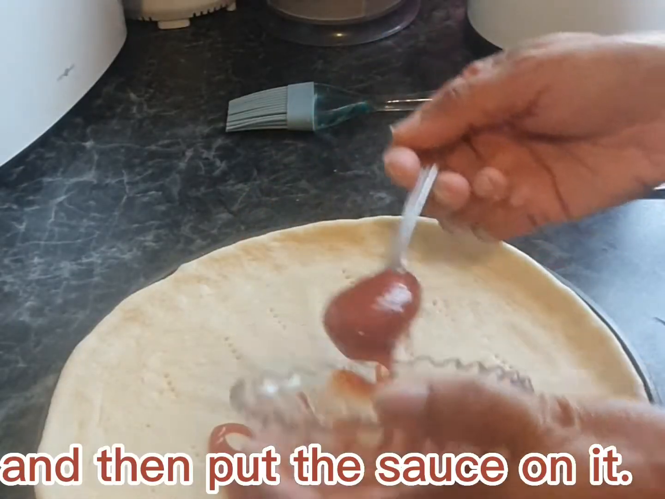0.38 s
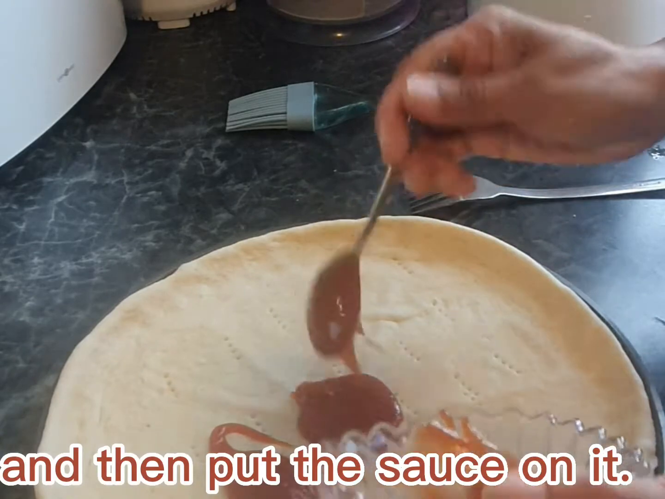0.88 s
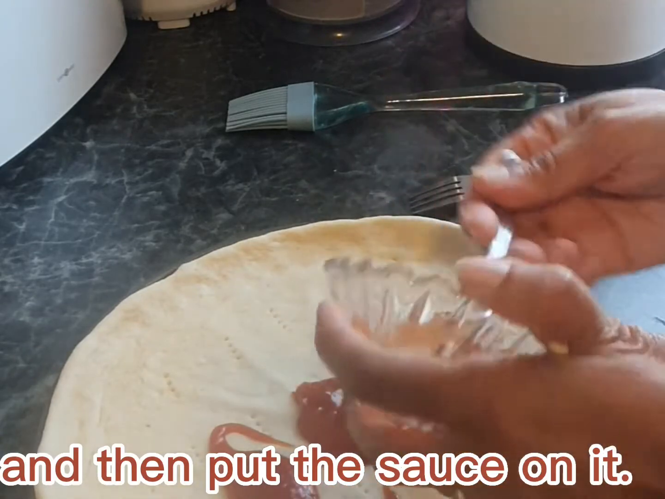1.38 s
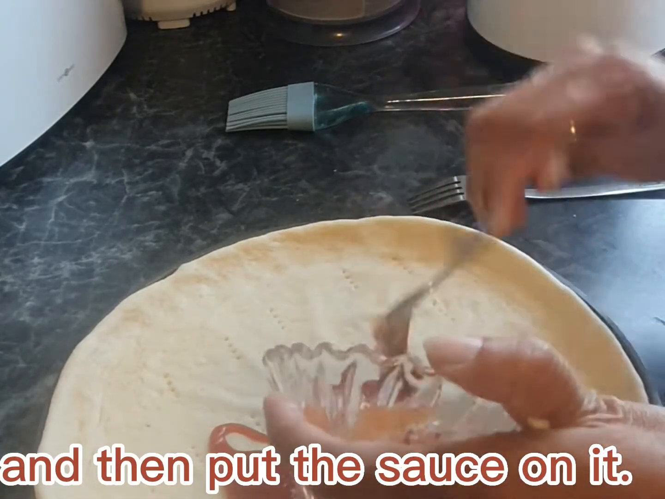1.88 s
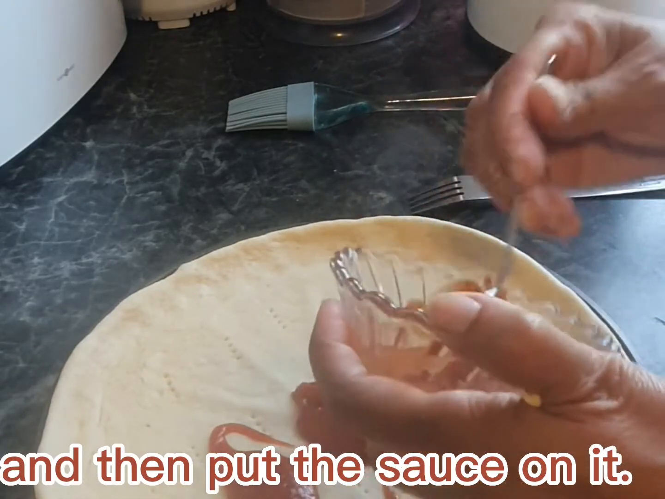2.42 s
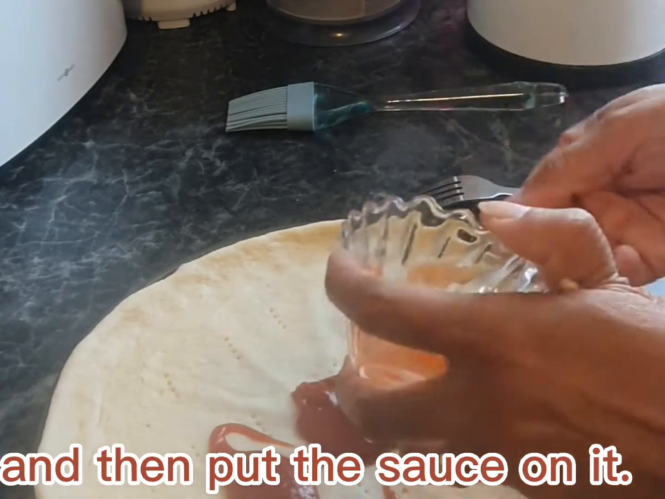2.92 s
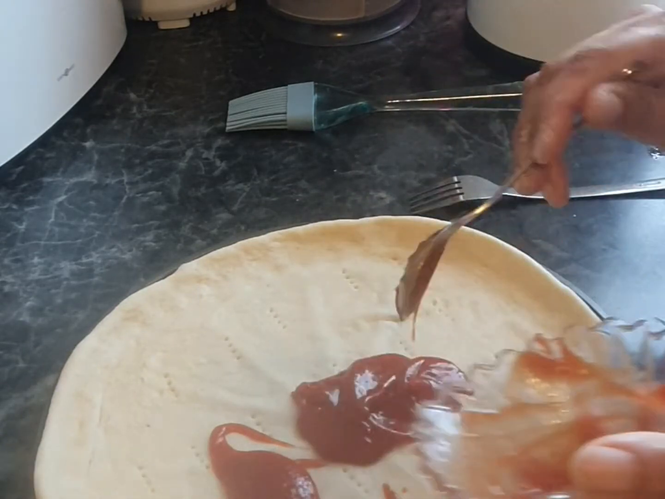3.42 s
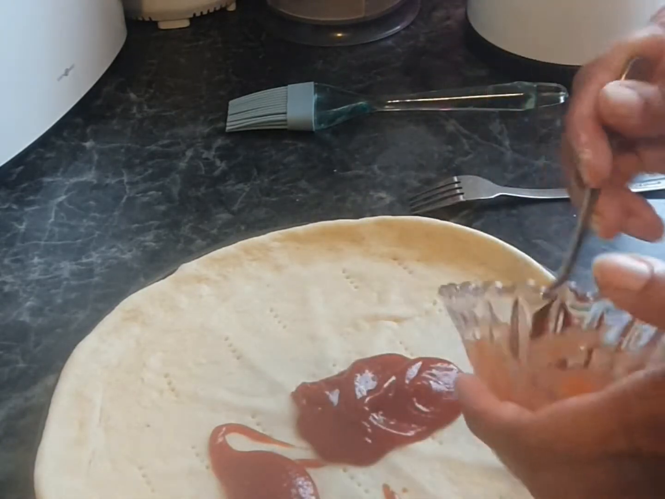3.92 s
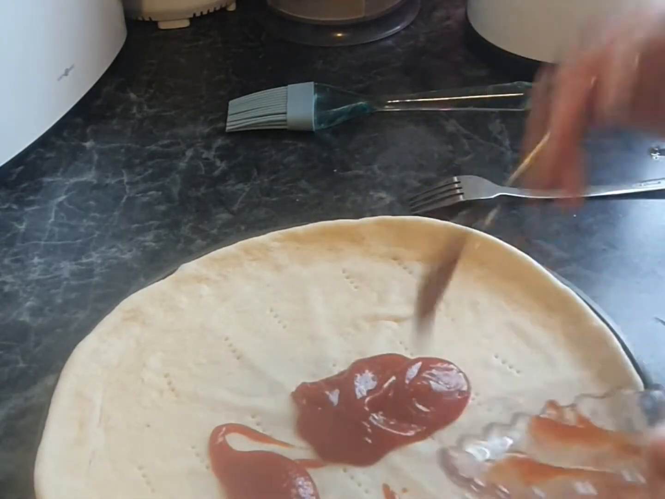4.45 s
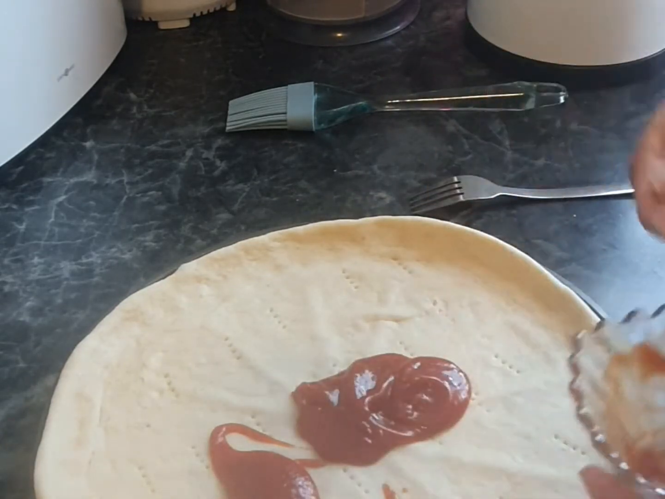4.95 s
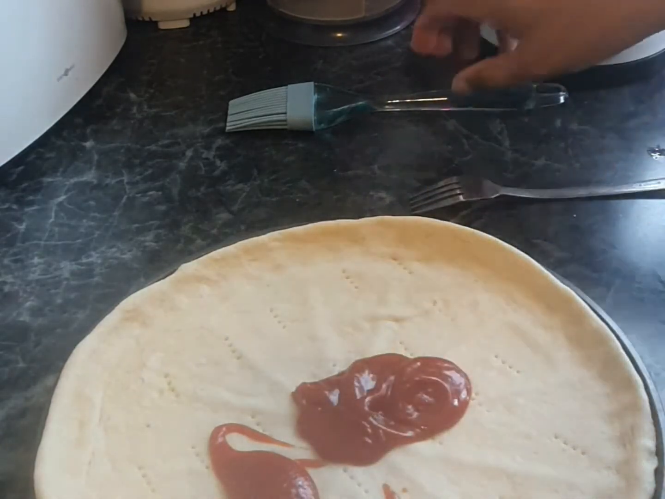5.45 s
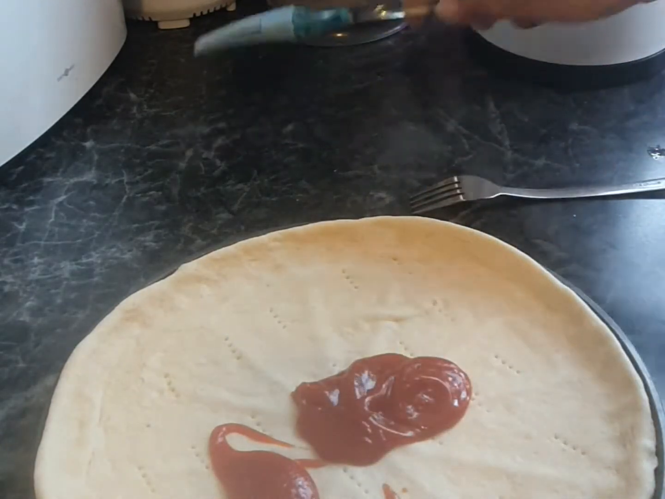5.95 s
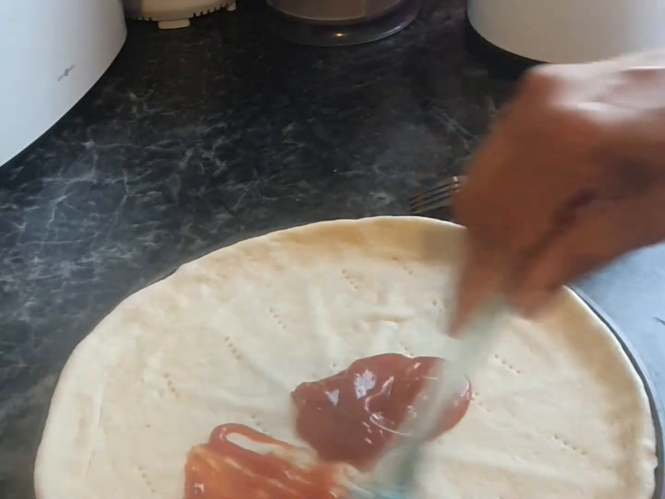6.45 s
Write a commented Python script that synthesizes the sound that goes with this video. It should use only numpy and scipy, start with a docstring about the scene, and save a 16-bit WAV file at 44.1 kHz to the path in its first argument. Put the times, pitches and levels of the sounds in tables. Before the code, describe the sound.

Close-up kitchen sounds with short room reflections. Steel spoon knocks against held glass give dry, high clinks in uneven clusters, and then the work quietens. The glass bowl is put down and rocks briefly on the hard worktop, ringing brighter and longer. Afterwards comes a soft low thump, then muffled rubbing of a brush. Underneath run a faint motor hum, airy murmur and the low drone of an engine outside.

```python
"""A steel spoon knocks a small hand-held glass bowl in a kitchen; then the bowl is set down and rattles.
Each blow adds short dying sines for glass and steel to a puff of noise; echoes and a noisy tail follow.
Sleeves and a brush rustle softly as grainy noise, over a murmur of filtered noise.
An appliance hums as wavering sines; a vehicle outside speeds up and shifts gear as two gliding sines."""
import sys
import numpy as np
from scipy import signal
from scipy.fft import rfft, irfft
from scipy.io import wavfile
from scipy.ndimage import uniform_filter1d

SR = 44100
rng = np.random.default_rng(int(sys.argv[2]) if len(sys.argv) > 2 else 0)


def undo_db(level):
    """Turn decibels back into plain size, where 20 dB means ten times bigger."""
    steps = np.asarray(level, float) / 20
    return 10 ** steps


def unload_wav(signal):
    """Save mono or channel-first audio to the path in sys.argv[1] as 16-bit WAV at rate SR, clipped to [-1, 1]."""
    wavfile.write(
        sys.argv[1],
        SR,
        np.round(np.clip(np.atleast_2d(signal).T, -1, 1) * 32767).astype(np.int16),
    )


N = 290599  # length in samples

# the families of rim shapes in which the glass can ring: f/Hz
SHAPES_HZ = (2200, 5000, 8300, 12500)
# the notes of the steel spoon: f/Hz
SPOON_HZ = (740, 965, 1220, 1455, 1590, 1820, 2500, 3180, 3460, 3900, 4290, 4720, 5235, 5880, 6540, 7000,
            8480, 9250, 10280, 10900, 11500)
RUB_RISE = 0.6  # a rub swells in this share of its fall time


def evened(x):
    """Scales a sound to unit loudness (rms)."""
    return x / np.sqrt(np.mean(x ** 2) + 1e-20)


def read(points, hz):
    """Reads a curve of (frequency, value) points, straight between them on a log frequency scale."""
    f, value = np.transpose(points)
    return np.interp(np.log(hz + 1), np.log(f + 1), value)


def add(mix, s, sound):
    """Lays a stereo sound into the mix from s seconds on, cut off at the end."""
    part = mix[:, round(s * SR):][:, :sound.shape[1]]
    part += sound[:, :part.shape[1]]


def sides(pan_db):
    """Gains of left and right; the left is pan_db louder."""
    return undo_db(np.array([[pan_db / 2], [-pan_db / 2]]))


def coloured(x, gain):
    """Filters x by gain(hz), with unit loudness after."""
    hz = np.fft.rfftfreq(x.shape[-1], 1 / SR)
    return evened(irfft(rfft(x) * gain(hz), x.shape[-1]))


def drift(rate_hz):
    """A random wander of unit size, mostly slower than rate_hz."""
    return coloured(rng.standard_normal(N), lambda hz: 1 / (1 + (hz / rate_hz) ** 2))


def murmur():
    """Room and street: random short-time spectra, alike in both ears in the bass, in drifting patches."""
    # tone of the murmur: f/Hz, level/dB per Hz (relative)
    air = [(15, -35), (25, -11), (38, -8), (59, 0.5), (76, -11), (108, -7.5), (123, -14), (149, -12),
           (175, -15), (489, -18), (775, -23), (2610, -42), (5570, -55), (14800, -56.5), (16000, -67)]
    # its swelling: t/s, level/dB (relative)
    swell = [(0.0, -62), (1.3, -60), (1.9, -60.5), (2.6, -57.5), (3.1, -62), (5.0, -62), (6.0, -63.5),
             (6.59, -60)]
    # likeness of left and right: f/Hz, likeness (1 = same, -1 = opposite)
    likeness = [(60, 0.87), (180, 0.81), (550, 0.41), (1650, -0.16), (4970, -0.051), (15000, -0.61)]
    # how much louder the left is: f/Hz, difference/dB
    lean_points = [(60, 5), (180, -2.5), (550, -2.5), (1650, -6), (4970, -1.5), (15000, 1)]
    patchy_db = 1.5
    frames, hz = N // 512 + 5, np.fft.rfftfreq(2048, 1 / SR)
    a, b, c, d, patches = rng.standard_normal((frames, 1025, 5)).T
    patches = uniform_filter1d(patches, 20, 0)  # smooth over frequency
    patches = evened(uniform_filter1d(patches, 10, 1))  # and over time

    left = a + 1j * b
    other = c + 1j * d
    same = np.clip(read(likeness, hz), -1, 1)[:, None]
    spectra = np.array([left, same * left + np.sqrt(1 - same ** 2) * other])
    lean = read(lean_points, hz)[:, None] / 2
    spectra *= undo_db(read(air, hz)[:, None] + patchy_db * patches + np.array([lean, -lean]))
    band = (hz > 200) & (hz < 1500)  # the band that sets the loudness
    spectra /= np.sqrt(np.mean(abs(spectra[:, band]) ** 2) * band.mean())

    s, db = np.transpose(swell)
    swell_db = np.interp(np.arange(frames) * 512 / SR, s, db - db.mean())
    reach = read([(100, 0.96), (1000, 1.0), (6000, 0.42)], hz)[:, None]  # the microphone's own hiss swells least
    spectra *= undo_db(-23.0 + db.mean() + reach * swell_db)
    return signal.istft(spectra, nperseg=2048, noverlap=1536)[1][:, :N]


def hum():
    """The appliance: steady motor notes that waver a little in strength."""
    # motor notes: f/Hz, level/dB (before the wavering)
    orders = [(49.15, -54.5), (97.6, -62.5), (98.7, -62.5), (146.5, -66)]
    waver_db = 1.6
    t = np.arange(N) / SR
    lines = 0
    for hz, db in orders:
        strength = undo_db(db + waver_db * drift(1.4))
        lines = lines + strength * np.sin(2 * np.pi * (hz * t + rng.random()))
    return np.sqrt(2) * lines * sides(1.5)


def boom(hz):
    """Gain of the room for a low note: it swells as it crosses a resonance."""
    # the room's bass resonances: f/Hz, half width/Hz, level/dB
    booms = [(59.97, 9.5, 3.5), (71.2, 2.8, 10), (80.3, 3, 12), (153.3, 7, 20)]
    return np.sqrt(1 + sum(undo_db(2 * db) / (1 + ((hz - f) / width) ** 2) ** 2 for f, width, db in booms))


def vehicle():
    """The engine's firing note and its octave come through the walls, slightly rough."""
    # it climbs in one gear, shifts up and draws away: t/s, firing f/Hz, level/dB (before room and roughness)
    engine = [(0, 70.32, -61.5), (.3, 71.35, -70.5), (.65, 72.85, -53), (1.3, 80.53, -56.5),
              (1.65, 82.98, -61.5), (1.92, 83.64, -50), (2.22, 83.38, -68), (2.42, 76.42, -54),
              (2.6, 66.08, -46.5), (2.8, 60.3, -48), (2.9, 59.23, -82), (3.2, 58.3, -58),
              (5.3, 59.45, -68.5), (6.3, 58.6, -60), (6.59, 57.96, -49.5)]
    octave_db = -17  # the octave against the firing note
    s, *columns = np.transpose(engine)
    hz, db = (np.interp(np.arange(N) / SR, s, c) for c in columns)
    turn = 2 * np.pi * np.cumsum(hz * (1 + 0.0045 * drift(9.6))) / SR
    rough = undo_db(db + 1.5 * drift(10.0))
    firing = boom(hz) * np.sin(turn) * sides(0.46)
    octave = undo_db(octave_db) * boom(2 * hz) * np.sin(2 * turn) * sides(-2.9)
    return np.sqrt(2) * rough * (firing + octave)


def kitchen(x):
    """The room's tail: sparse clicks of random sign, one in every 20 samples, each band dying at its own speed."""
    # how long the tail lasts: f/Hz, time to fall by 60 dB/s
    fade_times = [(500, .3), (2000, 0.26), (5000, .22), (10000, 0.18), (15000, 0.16)]
    clicks = np.zeros((2, SR // 2))
    at = np.arange(150, SR // 2 - 20, 20)
    places = at + rng.integers(0, 20, (2, len(at)))
    np.put_along_axis(clicks, places, rng.choice([-1.0, 1.0], (2, len(at))), 1)
    hz, t, bands = signal.stft(clicks, SR, nperseg=128)
    bands *= undo_db(-60 * t / read(fade_times, hz)[:, None])
    # make all bands about equally strong
    bands /= np.linalg.norm(uniform_filter1d(abs(bands), 5, 1), axis=2, keepdims=True)
    tail = signal.istft(bands, SR, nperseg=128)[1]
    return signal.fftconvolve(x, tail / np.linalg.norm(tail[0]), axes=1)[:, :N]


def rustle(db, fall, hz, octaves):
    """A soft rub: a grainy puff of noise round one broad band."""
    rise = RUB_RISE * fall
    t = np.arange(-3 * rise, 5 * fall, 1 / SR)
    shape = np.where(t < 0, np.exp(-(t / rise) ** 2), np.exp(-t / fall))
    grain_db = 1.6 * rng.standard_normal(len(t) // 100 + 1)  # a new strength every 100 samples
    grain = rng.standard_normal((2, len(t))) * undo_db(grain_db.repeat(100)[:len(t)])
    puff = coloured(grain, lambda f: np.exp(-(np.log2((f + 1) / hz) / octaves) ** 2))
    return undo_db(db) * sides(-6.0) * shape * puff


def ringing(hz, db, t60, pan_db):
    """Dying sines set going by one blow, strengths partly by chance, each reaching the right ear a little later."""
    contact_s = 0.0005  # the time scale of the soft start
    lag, lag_spread = 0.00012, 0.00003  # delay to the right ear and its chance part, s
    t = np.arange(SR // 3) / SR
    chance = rng.random((len(hz), 2))
    sound = 0
    for f, d, decay, pan, (a, b) in zip(hz, db, t60, pan_db, chance):
        ears = np.array([t, np.maximum(t - lag - lag_spread * (2 * b - 1), 0)])
        strength = undo_db(d - 3.3 * a - 60 * t / decay)
        sound = sound + strength * sides(pan) * np.sin(2 * np.pi * f * ears)
    onset = 1 - np.exp(-np.array([t, np.maximum(t - lag, 0)]) / contact_s)
    return sound * onset


def knock(db, lean, fade=0.0015):
    """The dull contact: a short puff of noise, coloured by the touch and leaning by lean(hz) dB."""
    # tone of the contact: f/Hz, level/dB per Hz (relative)
    contact = [(200, -41.5), (700, -25.5), (1100, -9.5), (1800, 0.5), (2600, -6), (4000, -6.5), (6000, -13),
               (9000, -15), (13000, -13.5), (15500, -34.5), (16300, -64.5)]
    grit = rng.standard_normal((2, 2048))
    grit[1] = 0.3 * grit[0] + 0.95 * grit[1]  # the ears are partly alike
    puff = coloured(grit, lambda hz: undo_db(read(contact, hz) + lean(hz)))
    return undo_db(db) * sides(-2.5) * puff * np.exp(-np.arange(2048) / SR / fade)


def spoon(db):
    """Steel held in fingers or lying in sauce rings briefly."""
    # level of each spoon note under a blow: level/dB
    notes_db = np.array((-23, -23, -21, -25.5, -15.5, -9.5, -31, -22, -20.5, -34, -22, -17.5, -24.5, -29,
                         -26.5, -36, -22, -24.5, -25.5, -28.5, -25))
    count = len(SPOON_HZ)
    return ringing(SPOON_HZ, db + notes_db, np.full(count, 0.027), np.full(count, -3.0))


def bowl(shape_db, grip):
    """The glass rings as the blow drives its rim shapes; a grip shortens every ring."""
    # notes of the glass: f/Hz
    bowl_hz = (2150, 2215, 2890, 4880, 4961, 6598, 8030, 8075, 8200, 8590, 8956, 10540, 11360, 11820, 11955,
               13736, 14830, 15400)
    # for each note: level/dB (before the drive), time to fall by 60 dB when free/s, left over right/dB
    notes = [(-7, 0.12, 8), (0, 0.12, -8.5), (-12, 0.038, -3), (-5.5, 0.22, 0.5), (2, 0.1, -8.5),
             (-6, 0.039, -8.5), (-5.5, 0.064, 4), (-5.5, 0.049, 4), (5, 0.08, 6.5), (-16, 0.077, 3.5),
             (-8, 0.082, 6), (-8, 0.057, 1.5), (-11.5, .05, 0), (0.5, 0.07, 0.5), (-4.5, .07, -6.5),
             (-1.5, 0.034, -3), (-4.5, 0.029, -6.5), (-10, .06, 0)]
    db, t60, pan_db = np.transpose(notes)
    drive_db = read(list(zip(SHAPES_HZ, shape_db)), np.array(bowl_hz))
    return ringing(bowl_hz, db + drive_db, t60 * grip, pan_db)


def rock(knock_db, low_db, second_db, step_db):
    """Free glass on stone: longer rings, a hard knock, a thud of the worktop, the spoon jolted inside."""
    # the worktop's dull notes: f/Hz, level/dB (against the blow), time to fall by 60 dB/s
    counter = [(381, -32.5, .06), (500, -33.5, 0.045), (600, -30, .05), (814, -31, 0.14), (1035, -20, .05),
               (1293, -22.5, 0.042)]
    top_db = -7  # stone drives the highest shape less
    shape_db = (low_db, second_db, second_db + step_db, second_db + 2 * step_db + top_db)
    hz, db, t60 = np.transpose(counter)
    sound = bowl(shape_db, grip=0.82) + spoon(knock_db - 12.0)
    sound += ringing(hz, knock_db + db, t60, np.full(len(hz), -3.0))

    def lean(f):
        return 0.44 * read(list(zip(SHAPES_HZ, shape_db)), f)

    add(sound, 0, knock(knock_db - 13.5, lean, fade=0.012))
    return sound


def tap(knock_db, spoon_hz, drive_db, drop_db):
    """Held glass and held steel: short rings, the spoon's notes near its favoured pitch standing out."""
    third_drop = 1.4  # the third shape drops this many times as far as the second
    fourth_db = -11.5  # the fourth shape against the third

    def favour(hz, octaves):
        return np.exp(-(np.log2((np.asarray(hz) + 1) / spoon_hz) / octaves) ** 2)

    third_db = drive_db - third_drop * drop_db
    sound = bowl((drive_db, drive_db - drop_db, third_db, third_db + fourth_db), grip=0.51)
    sound += spoon(knock_db - 2.5 + 14.0 * favour(SPOON_HZ, 0.16))
    add(sound, 0, knock(knock_db - 10.5, lambda hz: 6.4 * favour(hz, 0.17)))
    low_cut = signal.butter(4, 620.0, "high", fs=SR, output="sos")  # small things radiate little bass
    return signal.sosfilt(low_cut, sound)


def scene():
    """Bowl and hands close by, with their echoes, over the steady sounds."""
    # soft rubs of hands, cloth and brush: t/s (the peak), level/dB, fall/s, centre f/Hz, width/octaves
    rustles = [(.68, -74, 0.045, 2460, 0.8), (3.66, -78.5, 0.099, 2710, .4), (4.87, -84, .05, 8030, 0.88),
               (5.615, -48.5, 0.023, 890, 0.91), (5.7, -77.5, 0.088, 2980, 1.9),
               (6.025, -80, .03, 7950, .9), (6.42, -64, 0.18, 890, 0.79), (6.53, -67.5, .11, 2870, 0.86),
               (5.613, -74.5, .012, 5000, 0.68), (6.545, -72.5, .04, 9700, .5)]
    # the freed bowl lands and rocks on the counter: t/s, blow level/dB,
    # drive of the lowest shape/dB, of the second/dB, step to each higher one/dB
    rocks = [(4.97, -10.5, -31, -18, -2), (4.977, -22, -19.5, -14.5, 0), (5.007, -11, -17.5, -13, 6),
             (5.0134, -10.5, -26.5, -15.5, -5), (5.0224, -13, -28, -14, 0.5),
             (5.0284, -13, -31.5, -19.5, -1), (5.0414, -16, -28.5, -21.5, 2.14),
             (5.075, -24, -45.5, -38.5, -3), (5.0897, -17.5, -32.5, -29, -6)]
    # spoon on the gripped bowl: t/s, blow level/dB, spoon's favoured f/Hz,
    # drive of the lowest shape/dB, drop to the next shape/dB
    taps = [(.0598, -26.5, 6000, -32, 15.5), (.0757, -18.5, 9000, -40.5, 0), (.1794, -65, 2000, -62, 23),
            (.2518, -50.5, 4500, -74, 13), (1.1992, -38, 5270, -43, 9), (1.2346, -8.5, 5700, -19.5, 13),
            (1.3768, -7, 4300, -15, 15), (1.9044, -48, 6970, -84, -4), (2.2991, -47, 3970, -54.5, 21.5),
            (2.3141, -18, 1530, -32, 11.5), (2.381, -6, 3860, -26.5, 10), (2.576, -11.5, 4380, -17, 5.5),
            (2.6657, -45, 3480, -37, 7.5), (2.6803, -8, 5240, -22.5, 8), (2.7336, -29, 3420, -40.5, 9.5),
            (2.8738, -49, 2100, -55, 20), (2.8897, -38, 3300, -50.5, 8.5), (3.8876, -24, 1650, -39.5, 8),
            (3.9799, -31, 10320, -51, 1.5)]
    # counter and wall: delay/ms, left level/dB, right level/dB
    echoes = [(2.1, -12, -18), (4.2, -13, -8), (5.6, -17, -10.5), (7.3, -9, -15)]

    near = np.zeros((2, N))
    for table, source in ((taps, tap), (rocks, rock)):
        for s, *row in table:
            add(near, s, source(*row))
    for s, db, fall, *row in rustles:
        add(near, s - 3 * RUB_RISE * fall, rustle(db, fall, *row))

    mix = near + undo_db(-4.0) * kitchen(near) + murmur() + hum() + vehicle()
    for ms, *ears_db in echoes:
        add(mix, ms / 1000, near * undo_db(np.array(ears_db))[:, None])
    return mix * np.minimum(np.arange(N) / 300, 1)  # a very short fade-in


def band_limit(x):
    """A steep low-pass at the top of the band."""
    return signal.sosfilt(signal.butter(12, 16430, fs=SR, output="sos"), x)


def record(dry):
    """The microphone squashes peaks and limits the band; gain control dips after loud blows, recovers slowly."""
    knee = 0.72  # the ceiling towards which peaks are squashed
    power_db = 10 * np.log10(abs(uniform_filter1d((dry ** 2).mean(0), 400)) + 1e-12)
    fall = np.arange(N) * 5.2 / SR  # the held peak level sinks by 5.2 dB a second
    held_db = np.maximum.accumulate(power_db + fall) - fall
    over_db = np.maximum(held_db + 14.5, 0)  # excess above -14.5 dB
    late_db = signal.lfilter([1 / 1500], [1, 1 / 1500 - 1], over_db)  # reacts over some 1500 samples

    squashed = knee * np.tanh(dry / knee)
    low_cut = signal.butter(4, 40.0, "high", fs=SR, output="sos")
    high_cut = signal.cheby2(8, 40, 16800, fs=SR, output="sos")
    limited = signal.sosfilt(high_cut, signal.sosfilt(low_cut, squashed))
    return band_limit(limited / undo_db(0.5 * late_db))  # half of the excess is taken away


dry = scene()
out = record(dry)
unload_wav(out)
```